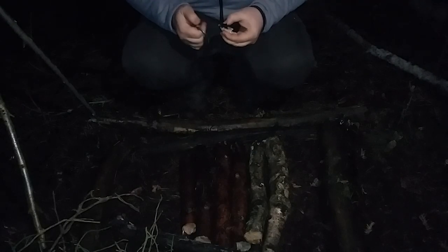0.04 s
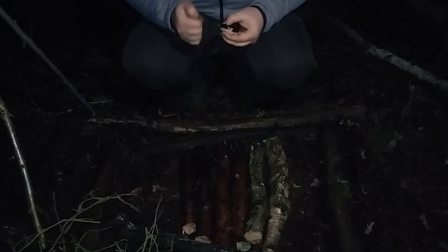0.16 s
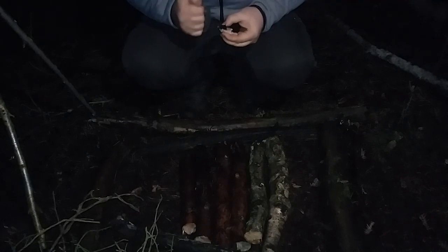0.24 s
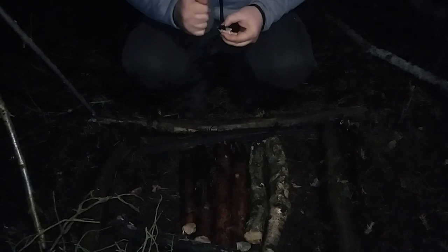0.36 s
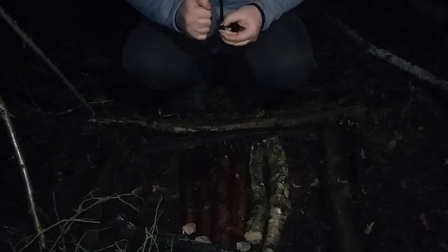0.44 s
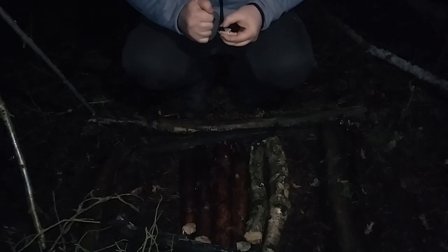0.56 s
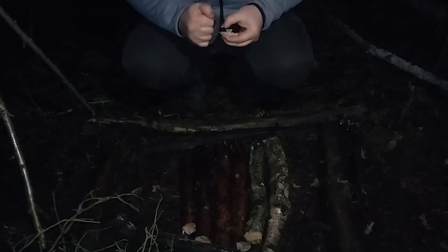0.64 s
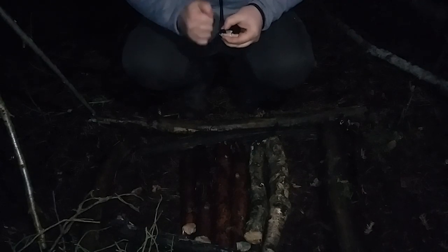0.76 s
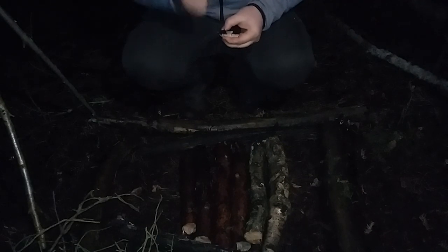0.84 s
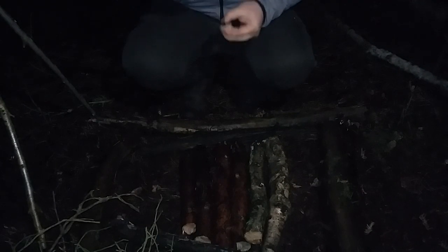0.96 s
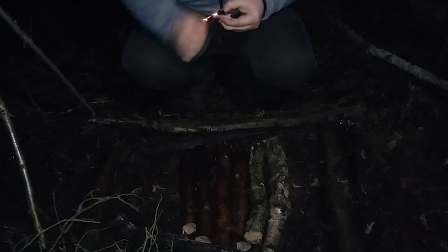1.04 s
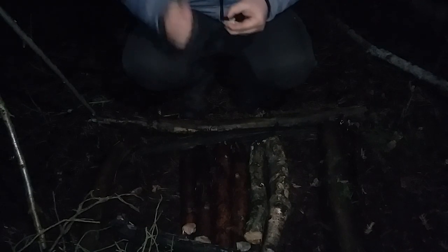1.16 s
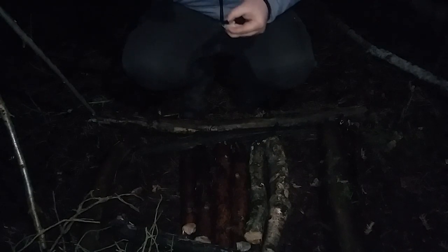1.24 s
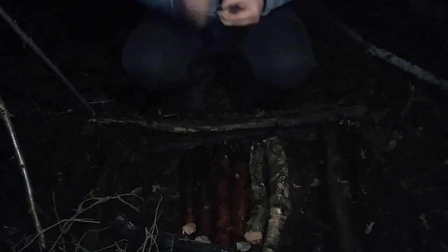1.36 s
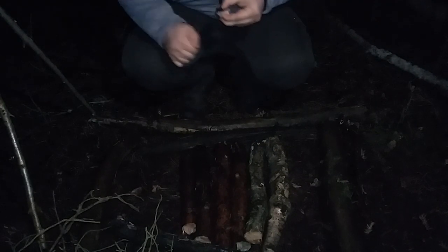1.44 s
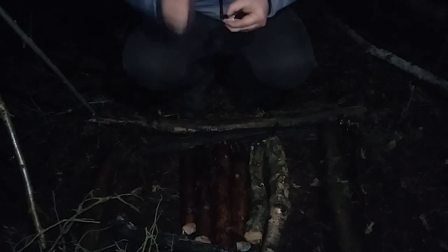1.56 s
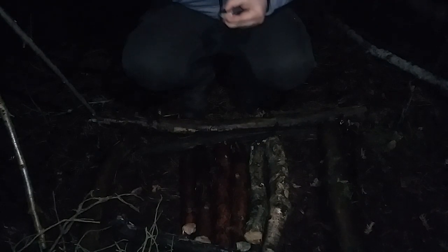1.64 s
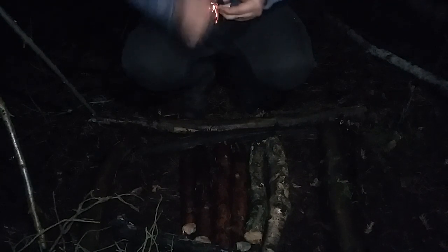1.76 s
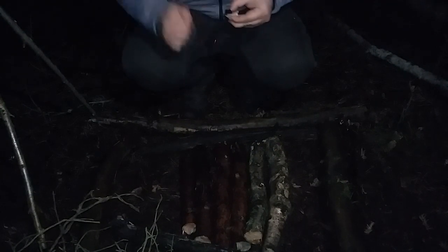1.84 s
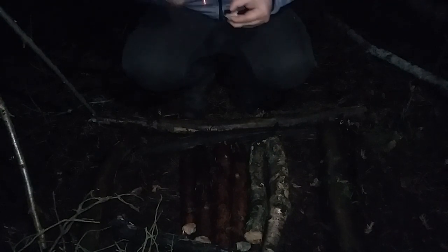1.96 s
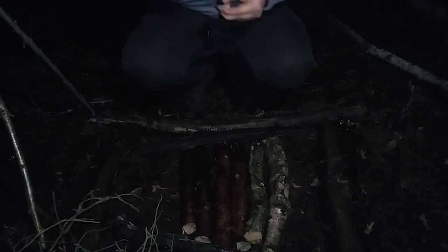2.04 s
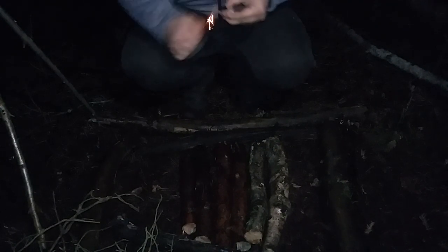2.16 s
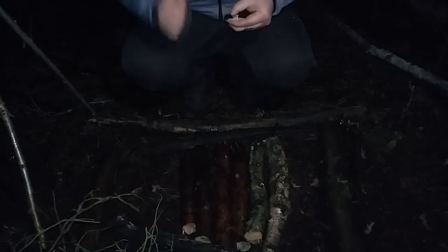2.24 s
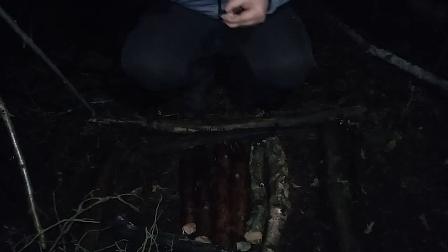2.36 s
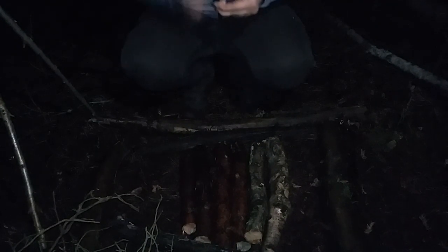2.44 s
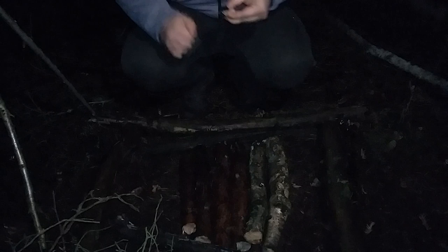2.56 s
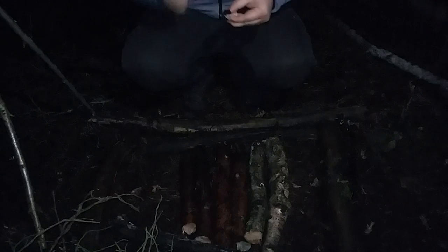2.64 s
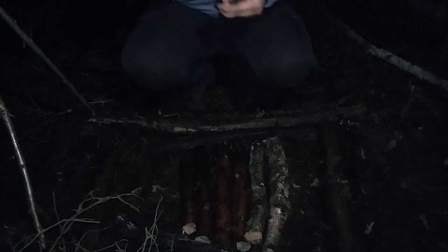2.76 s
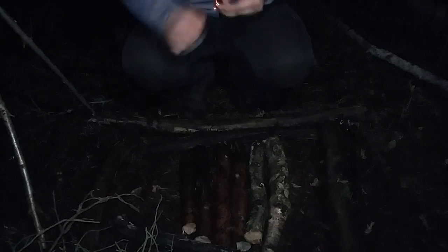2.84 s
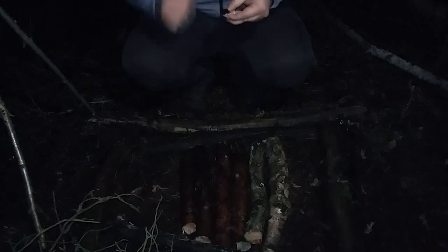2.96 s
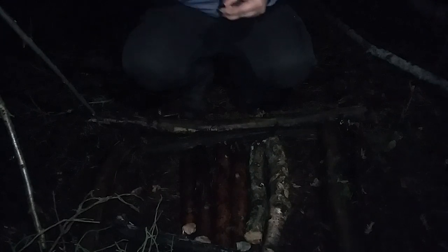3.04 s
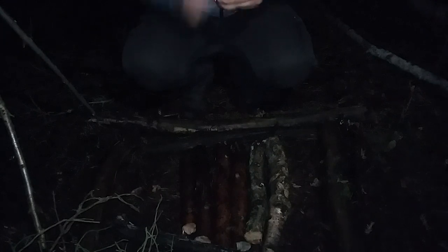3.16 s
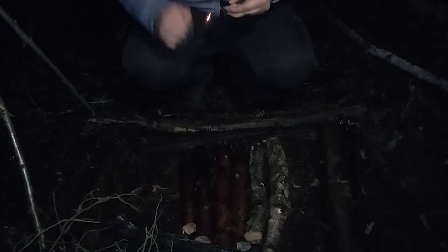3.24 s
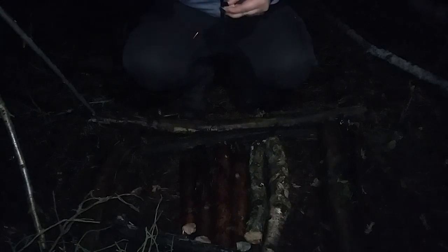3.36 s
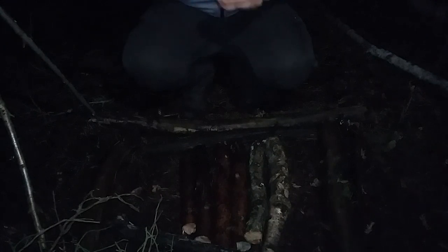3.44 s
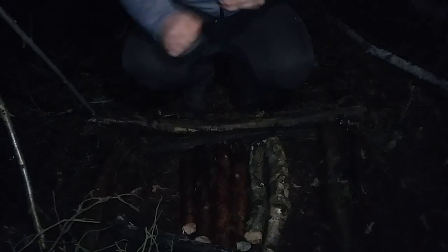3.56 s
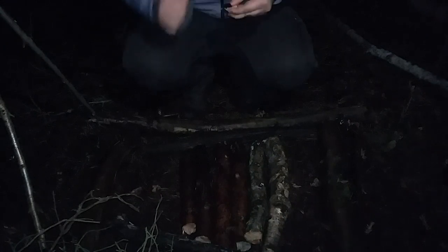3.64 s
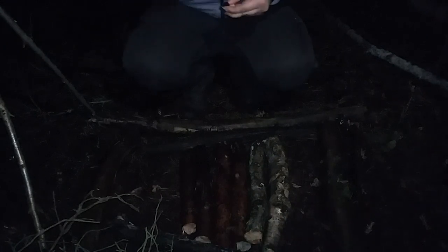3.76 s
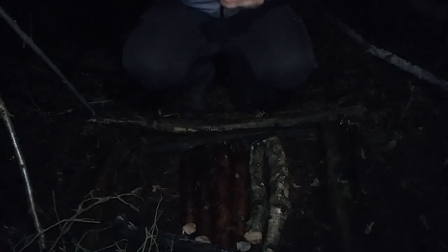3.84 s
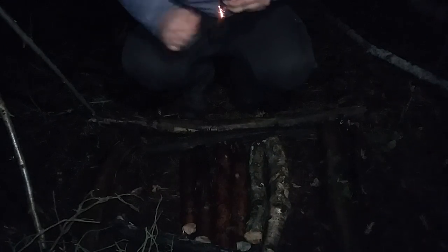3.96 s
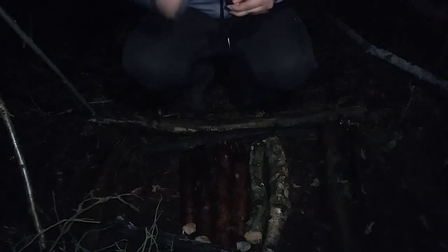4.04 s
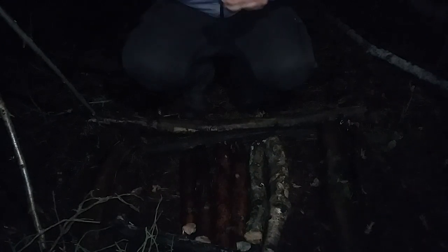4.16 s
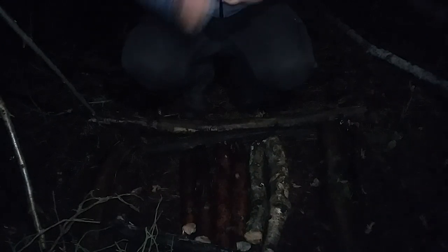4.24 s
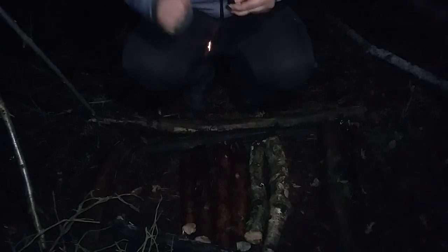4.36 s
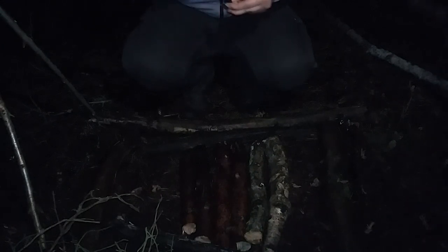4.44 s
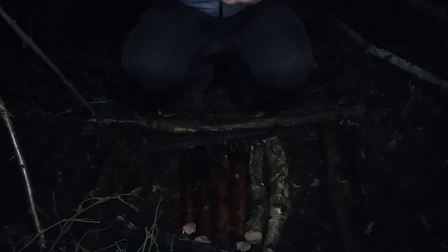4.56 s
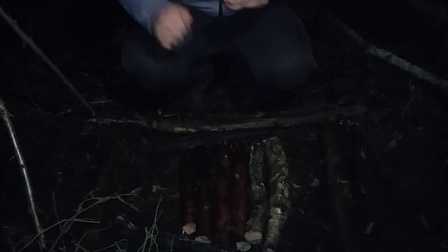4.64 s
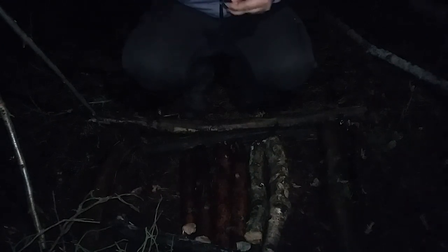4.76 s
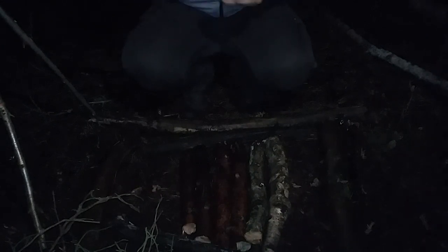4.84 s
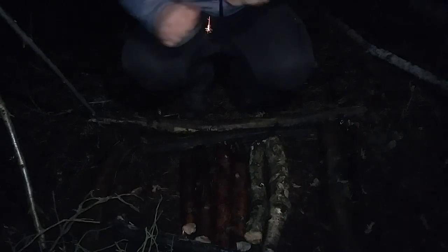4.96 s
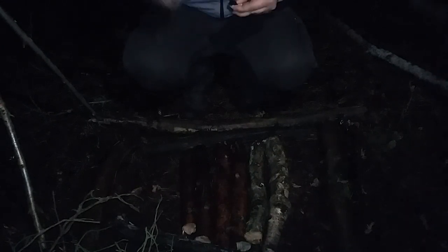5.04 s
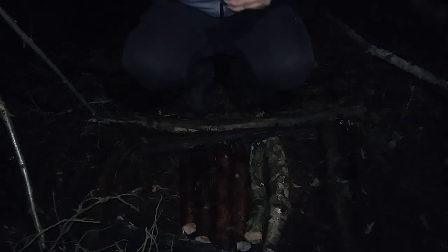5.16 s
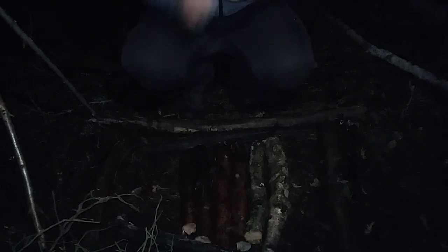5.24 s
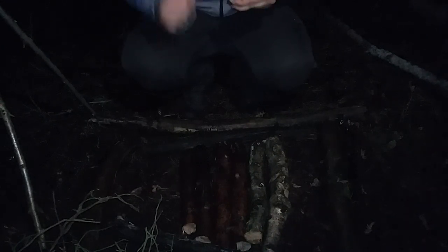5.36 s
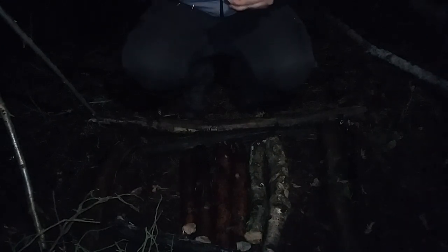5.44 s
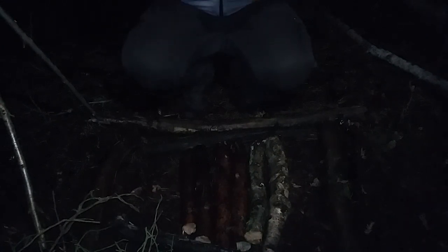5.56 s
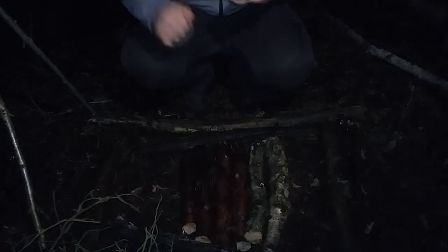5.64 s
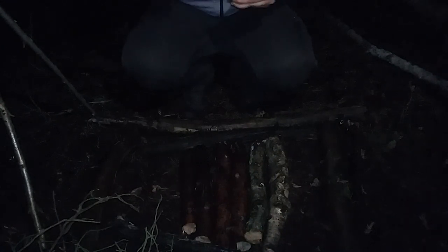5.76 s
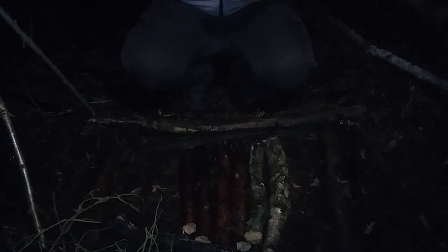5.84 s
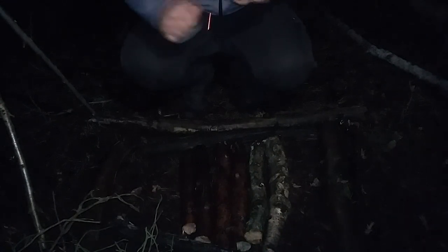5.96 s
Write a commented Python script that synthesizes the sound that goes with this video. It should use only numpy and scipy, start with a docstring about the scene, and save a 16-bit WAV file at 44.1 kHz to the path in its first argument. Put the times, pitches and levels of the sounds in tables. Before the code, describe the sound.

Short, bright scrapes of steel on a spark rod stand out close by against still night air in the woods. After one faint tick and rub, the strokes come in an even run, roughly three a second, each a clipped rasp with a slight metallic ring that scatters softly among the trunks. A thin steady hiss and a low, far-off rush continue quietly throughout.

```python
"""A steel striker snaps along a ferrocerium rod about three times a second, in a wood at night.
It is first set on the rod with a soft tick and a light rub. Then each stroke bites with a crackle of
hot chips, chatters down the rod and slips off; the hand-damped metal rings for a few milliseconds.
Trunks scatter every scrape into a faint tail, over thin hiss and a distant roar that swells and sinks."""
import sys
import numpy as np
from scipy import signal
from scipy.fft import rfft, irfft
from scipy.io import wavfile
from scipy.ndimage import uniform_filter1d

SR = 44100
rng = np.random.default_rng(int(sys.argv[2]) if len(sys.argv) > 2 else 0)


def bounce(signal):
    """Save signal as a 16-bit WAV file at the path given by the first command-line argument."""
    frames = np.transpose(np.atleast_2d(signal))
    limited = np.clip(frames, -1, 1)
    pcm = np.round(limited * 32767).astype(np.int16)
    wavfile.write(sys.argv[1], SR, pcm)


N = 265041

# modes of the hand-held rod and striker: (pitch [Hz], width [Hz], level [dB], left minus right [dB])
METAL_MODES = [(1356, 190, -14, 0), (1848, 87, -13.5, -14.5), (2554, 500, 0.5, -2.5),
               (2770, 370, -0.5, -2.7), (3540, 330, -0.5, 1), (4784, 180, -13, 11), (6013, 240, -13.5, 5.5),
               (6320, 240, -26.5, 17), (8840, 510, -38, 12), (11900, 4100, -39, -1.5)]


def striker():
    """The run of strokes, each with its crackle, lingering ring and scatter from the wood."""
    # one row a stroke, levels relative within each column: (time [s], length [s], bite [dB], drag [dB],
    # slip-off [dB], chatter [Hz], main ring [Hz], upper ring [dB], crackle [dB])
    strokes = [(1.097, 0.0082, -27.5, -42, -30.5, 2527, 2660, 5.5, -72),
               (1.446, 0.018, -25.5, -32.5, -36, 3864, 2800, 1.5, -73),
               (1.8145, .014, -19.5, -26, -52.5, 2315, 2800, -1.5, -62.5),
               (2.1719, 0.018, -17, -29.5, -37, 2184, 2710, 0, -56),
               (2.5426, 0.014, -19, -27, -34, 2445, 2490, 2.5, -57.5),
               (2.8862, 0.013, -16, -28.5, -37.5, 2770, 2720, 0.5, -55),
               (3.2324, 0.018, -18.5, -33.5, -28, 2406, 2760, -2, -60.5),
               (3.5708, 0.012, -16, -23.5, -22.5, 2883, 2660, 0, -54.5),
               (3.967, 0.015, -20.5, -26, -23, 2440, 2650, -1, -73),
               (4.3153, .02, -17.5, -31, -39, 2600, 2740, 0.5, -53),
               (4.655, .011, -20, -26.5, -29, 2478, 2630, 3, -64.5),
               (4.9796, .014, -20, -31, -32, 2736, 2720, 2.5, -74),
               (5.3252, 0.0068, -17.5, -21, -34.5, 2660, 2870, 3.5, -54),
               (5.6509, 0.0092, -17, -21, -35, 2718, 2800, 2, -53.5),
               (5.9704, 0.02, -18, -29, -26, 2630, 2810, 1.5, -64)]
    out = np.zeros((2, N))
    for s, length_s, bite_db, drag_db, slip_db, chatter_hz, main_hz, upper_db, crackle_db in strokes:
        modes = gripped_modes(s, main_hz, bite_db, upper_db, crackle_db)
        left, right = band(stroke(length_s, bite_db, drag_db, slip_db, chatter_hz, modes), 920, 21000)
        scrape = np.array([left, np.roll(right, 1)]) + crackle(crackle_db)  # the left leads by a hair
        add(out, scrape, s)
        add(out, after_ring(pressed_hz(3920, bite_db, stiffening=0.12), bite_db - 48), s + length_s)
        add(out, forest(scrape, near_db=-9, near_t60=0.074, far_db=-25.5, far_t60=0.67), s)
    return out


def stroke(length_s, bite_db, drag_db, slip_db, chatter_hz, modes):
    """The edge digs in with a snap, bites hard, chatters along the rod and flicks off its end."""
    t = np.arange(4096) / SR
    bite = np.exp(-(t / 0.0035) ** 4) * np.clip(0.39 + t / 0.0036, 0, 1)
    bite *= chips(t, rate_hz=2400, grit=0.55)
    bite[0] += 3.5  # the opening snap
    drag = np.clip(t / 0.0042, 0, 1) * np.clip((length_s - t) / 0.001, 0, 1)
    # the edge skips, so the pressure comes and goes
    pressure = undb(2.3 * unit(uniform_filter1d(rng.standard_normal(len(t)), size=110)))
    slip = np.exp(-((t - length_s + 0.0038) / 0.00029) ** 2)
    friction = chatter(t, chatter_hz)
    # sliding is a smoother force: modes far from the chatter get less of it
    sliding = modes.copy()
    sliding[:, 2] -= 6.3 * np.abs(np.log2(modes[:, 0] / chatter_hz))
    return (metal(bite, modes, 0.0036) * undb(bite_db - 5.5)
            + metal(drag * pressure * friction, sliding, max(length_s - .006, .001)) * undb(drag_db - 4.5)
            + metal(slip * friction, sliding, 0.0031) * undb(slip_db - 7.5))


def chips(t, rate_hz, grit):
    """The edge catches and tears off chips at uneven intervals, with fine grinding between them."""
    tears = np.zeros(len(t))
    gaps, sizes = rng.random((400, 2)).T
    at = (np.cumsum(.5 + gaps) * SR / rate_hz).astype(int)
    inside = at < len(t)
    np.add.at(tears, at[inside], .5 + sizes[inside])
    return unit(tears) + grit * rng.standard_normal(len(t))


def chatter(t, hz):
    """Stick and slip lock on to one ring of the metal: nearly even pulses, with grinding between them."""
    cycles = np.cumsum(hz * (1 + .16 * rng.standard_normal(len(t)))) / SR
    slips = np.diff(np.floor(cycles), prepend=0) * undb(2.1 * rng.standard_normal(len(t)))
    return unit(slips) + .7 * rng.standard_normal(len(t))


def metal(force, modes, contact_s):
    """A force rings the modes; each gets the energy of its level held for the contact time."""
    out = 0
    for hz, width_hz, db, pan_db in modes:
        mode = ring(band(force, hz / 1.096, hz * 1.1, order=1), hz, width_hz)
        out = out + unit(mode) * undb(db + np.array([[pan_db], [-pan_db]]) / 2)
    return out * np.sqrt(contact_s * SR / len(force))


def gripped_modes(s, main_hz, bite_db, upper_db, crackle_db):
    """Grip, pressure and contact point retune the strongest modes and shift their balance."""
    # the hold creeps and lets other rings through: (time [s], low ring boost [dB], treble boost [dB])
    grip = [(1.1, 4, 2), (2.2, 2.5, 0), (3.6, 4, 2.5), (4.3, 7.5, 1), (5.0, 10.5, -2), (5.97, 9, 1.3)]
    times, low_db, treble_db = np.transpose(grip)
    modes = np.array(METAL_MODES, float)
    hz, db = modes[:, 0], modes[:, 2]
    low, main, upper, treble = 0, slice(2, 4), 4, slice(5, None)
    hz[main] *= main_hz / hz[main].mean()
    hz[upper] = pressed_hz(3718, bite_db, stiffening=0.068)
    db[low] += np.interp(s, times, low_db)
    db[upper] += upper_db
    db[treble] += np.interp(s, times, treble_db) + 0.14 * (crackle_db + 60.5)  # more chips, more treble
    return modes


def pressed_hz(hz, bite_db, stiffening, usual_bite_db=-19):
    """Pressing harder stiffens the contact: a ring's pitch rises as a power of the force."""
    return hz * undb(bite_db - usual_bite_db) ** stiffening


def crackle(db):
    """Hot chips tear off during the bite: a few milliseconds of tiny bright snaps, leaning left."""
    # colour of the snaps: (frequency [Hz], level [dB])
    snap_eq = [(4000, -11.5), (7400, 6), (8800, 26), (9800, 5), (11000, 0.5), (12200, 0.5), (13500, -5.5),
               (15000, -2.5), (17000, -9)]
    t = np.arange(4096) / SR
    snaps = rng.standard_normal((2, len(t))) * undb(3.9 * rng.exponential(size=len(t)))
    envelope = np.clip(t / 0.0025, 0, 1) * (np.exp(-t / 0.0026) + .04 * np.exp(-t / 0.004))
    return unit(colour(snaps, snap_eq) * envelope) * undb(db + np.array([[5.5], [-0.5]]))


def after_ring(hz, db, t60=0.7):
    """Once the edge is free, a faint rough ring lingers in the steel."""
    t = np.arange(SR) / SR
    tone = unit(ring(rng.standard_normal((2, SR)), hz, width_hz=90))
    return tone * undb(db - 60 * t / t60)


def touch(at_s=0.6135, contact_s=0.0023):
    """The edge meets the rod with one soft, dull tick."""
    # colour of the tick: (frequency [Hz], level [dB])
    tick_eq = [(600, -20), (1400, 6.5), (2600, 0), (4000, -3.5), (5500, -17), (12000, -25)]
    t = np.arange(4096) / SR
    force = np.exp(-t / contact_s) * rng.standard_normal(len(t))
    out = np.zeros((2, N))
    add(out, metal(force, METAL_MODES, contact_s) * undb(-44.5), at_s)
    return colour(out, tick_eq)


def rub():
    """Faint uneven friction as the edge feels for its place on the rod."""
    # envelope of the rub: (time [s], level [dB])
    envelope = [(0, -96), (.3, -85), (.4, -74.5), (0.599, -73.5), (.66, -74), (.71, -65), (.78, -85),
                (1.05, -100)]
    # the metal under light pressure: (pitch [Hz], width [Hz], level [dB], left minus right [dB])
    light_modes = [(2280, 500, -3, -8), (2698, 230, -1, 2.5), (3900, 300, -16, 2.5), (4940, 100, -15, -3)]
    level_db = curve(envelope) + 1.8 * walk(rate_hz=26)
    return metal(rng.standard_normal(N), light_modes, N / SR) * undb(level_db)


def forest(x, near_db, near_t60, far_db, far_t60):
    """Ground and legs scatter at once; trunks send back a long, sparse tail, different on each side."""
    # colour of the scatter from the trunks: (frequency [Hz], level [dB])
    trunk_eq = [(500, -9), (1400, -3.5), (2600, -6.5), (4200, 0.5), (6500, 1), (9000, -3), (15000, -4)]
    t = np.arange(SR) / SR
    near = unit(rng.standard_normal((2, SR)) * np.clip(t / 0.0052, 0, 1) * undb(-60 * t / near_t60))
    echoes = rng.standard_normal((2, SR)) * undb(1.6 * rng.exponential(size=(2, SR)))
    far = unit(colour(echoes, trunk_eq) * np.clip(t / 0.017, 0, 1) * undb(-60 * t / far_t60))
    response = (undb(near_db) * near + undb(far_db) * far) / np.sqrt(SR)
    # the rod radiates differently in each direction, so the scatter carries a blur of its spectrum
    power = np.mean(np.abs(rfft(x, SR)) ** 2, axis=0)
    blurred = np.sqrt(np.abs(uniform_filter1d(uniform_filter1d(power, size=700), size=500)))
    return irfft(rfft(response) * blurred, SR) * (1 - t ** 2)


def roar():
    """A far-off rush swells and sinks, more hollow when loud, over a steadier deep rumble."""
    # colour of the roar: (frequency [Hz], level [dB])
    roar_eq = [(20, -29), (35, -23.5), (55, -2.5), (72, 0.5), (110, -2.5), (150, -6), (215, -3), (300, -7),
               (440, -9.5), (610, -8.5), (760, -13.5), (1200, -26.5), (2000, -37), (4000, -50)]
    # envelope of the swell: (time [s], level [dB])
    swell = [(0, -54), (.85, -56), (1.25, -51.5), (2.0, -47), (2.3, -49.5), (2.55, -47), (3.35, -49.5),
             (3.8, -52.5), (4.27, -47.5), (4.75, -49), (5.28, -43), (5.7, -43), (6.01, -49)]
    # envelope of the rumble: (time [s], level [dB])
    rumble = [(0, -53), (1.85, -53.5), (2.7, -47), (3.6, -50.5), (4.4, -48), (5.2, -51.5), (6.01, -50)]
    # bands of the rush, which slowly brightens:
    # (low edge [Hz], high edge [Hz], usual level [dB], swell depth [dB/dB], drift [dB/s])
    rush_bands = [(129, 262, -54.5, 0.99, -0.37), (264, 491, -56.5, 1.0, 0), (476, 3400, -57.5, 0.77, .5)]
    t = np.arange(N) / SR
    swell_db = curve(swell) + 49.5  # relative to the usual level
    out = unit(band(diffuse(roar_eq), 20, 130, order=4)) * undb(curve(rumble))
    for lo_hz, hi_hz, db, depth, drift in rush_bands:
        level_db = db + depth * swell_db + drift * (t - t.mean()) + walk(rate_hz=7)
        out += unit(band(diffuse(roar_eq), lo_hz, hi_hz, order=4)) * undb(level_db)
    return out + hollow(width_hz=126) * undb(-56.5 + 1.57 * swell_db)


def hollow(width_hz):
    """The hollow tone in the roar: a narrow band of rush whose centre drifts."""
    # glide of the band: (time [s], centre [Hz])
    glide = [(0, 340), (1.85, 365.2), (2.6, 270), (3.25, 379.7), (4.2, 230.1), (5.3, 279.8), (6.01, 284.6)]
    phase = 2 * np.pi * np.cumsum(curve(glide)) / SR
    lowpass = signal.butter(2, width_hz / 2, fs=SR, output="sos")
    flutter = signal.sosfilt(lowpass, rng.standard_normal((2, N)))
    return unit(flutter[0] * np.cos(phase) + flutter[1] * np.sin(phase))


def night_air():
    """Still night air: a thin, steady hiss from all round."""
    # colour of the hiss: (frequency [Hz], level [dB])
    air_eq = [(400, -26), (900, 7.5), (1500, -4.5), (2500, -7), (3500, -12.5), (5500, -22.5),
              (10000, -24.5), (16000, -28)]
    return unit(diffuse(air_eq)) * undb(-63)


def diffuse(eq):
    """Noise from all round: centred in the bass, wide in the treble."""
    mid, side = colour(rng.standard_normal((2, N)), eq)
    side = colour(side, [(70, -26.5), (170, -16.5), (350, -10.5), (700, -4.5), (1400, 1)])
    return mid + side * np.array([[1], [-1]])


def undb(db):
    """Decibels to gain."""
    return 10 ** (np.asarray(db) / 20)


def unit(x):
    """Scale to rms 1."""
    return x / np.sqrt(np.mean(x ** 2) + 1e-20)


def colour(x, eq):
    """Shape a sound by (frequency [Hz], level [dB]) points on a log-frequency axis."""
    hz, db = np.transpose(eq)
    f = np.maximum(np.fft.rfftfreq(x.shape[-1], 1 / SR), 1)
    return irfft(rfft(x) * undb(np.interp(np.log(f), np.log(hz), db)), x.shape[-1])


def band(x, lo_hz, hi_hz, order=2):
    """Causal band-pass."""
    return signal.sosfilt(signal.butter(order, [lo_hz, hi_hz], "band", fs=SR, output="sos"), x)


def ring(x, hz, width_hz):
    """One damped resonance."""
    return signal.lfilter(*signal.iirpeak(hz, hz / width_hz, fs=SR), x)


def curve(points):
    """Straight ramps through (time [s], value) points, over the whole scene."""
    return np.interp(np.arange(N) / SR, *np.transpose(points))


def walk(rate_hz):
    """Smooth random wander, spread near 1."""
    step = int(SR / rate_hz)
    return uniform_filter1d(np.repeat(rng.standard_normal(N // step + 2), step), step)[:N]


def add(out, x, at_s):
    """Mix a sound in at a time."""
    start = int(at_s * SR)
    out[:, start:start + x.shape[1]] += x[:, :max(N - start, 0)]


def scene():
    """The edge is set and struck, over the distant roar and the night air."""
    return rub() + touch() + striker() + roar() + night_air()


def record(dry):
    """A steep low-pass cuts the top above 16 kHz."""
    return signal.sosfilt(signal.ellip(8, .2, 70, 16000, fs=SR, output="sos"), dry)


dry = scene()
out = record(dry)
bounce(out)
```